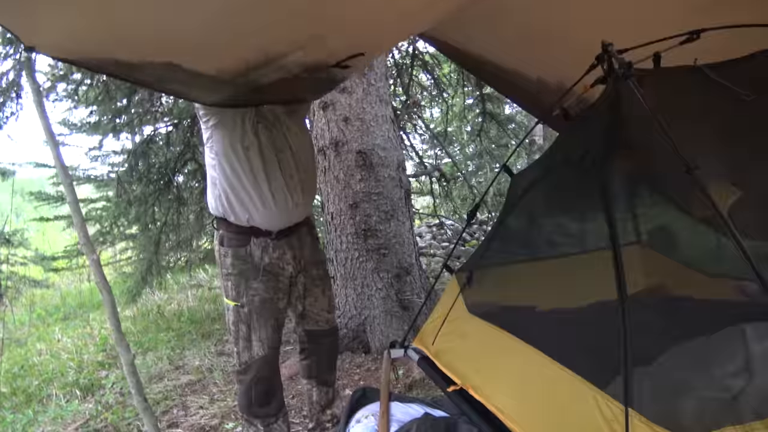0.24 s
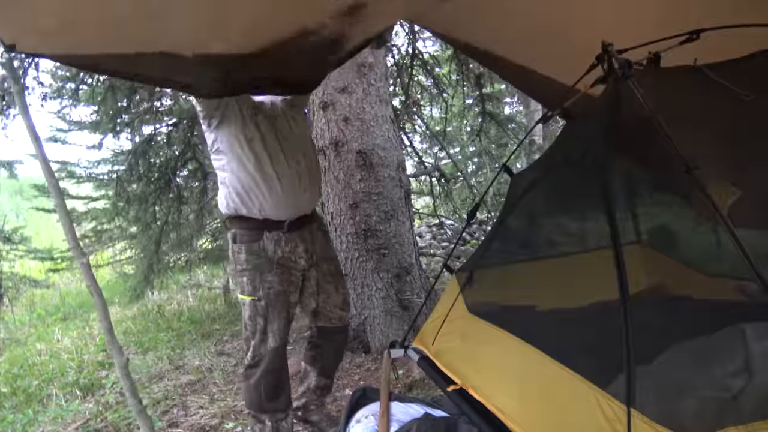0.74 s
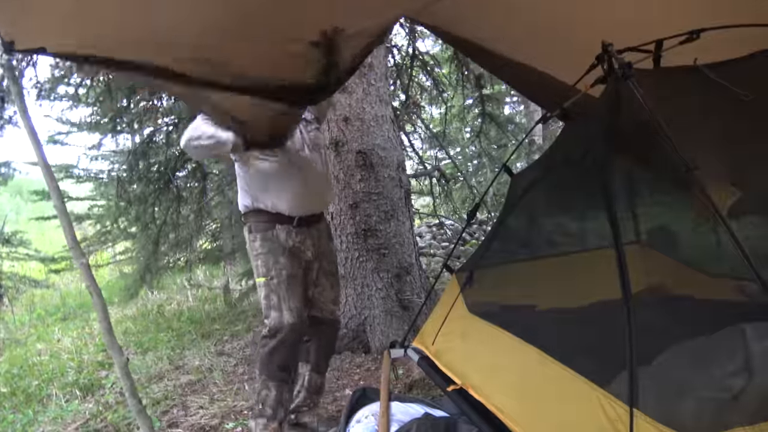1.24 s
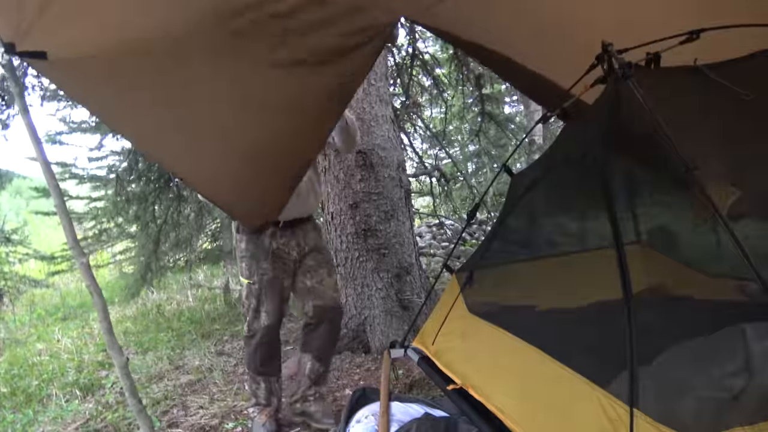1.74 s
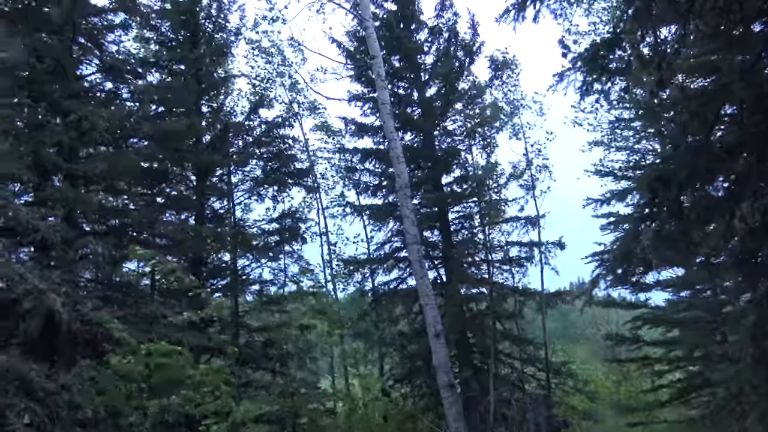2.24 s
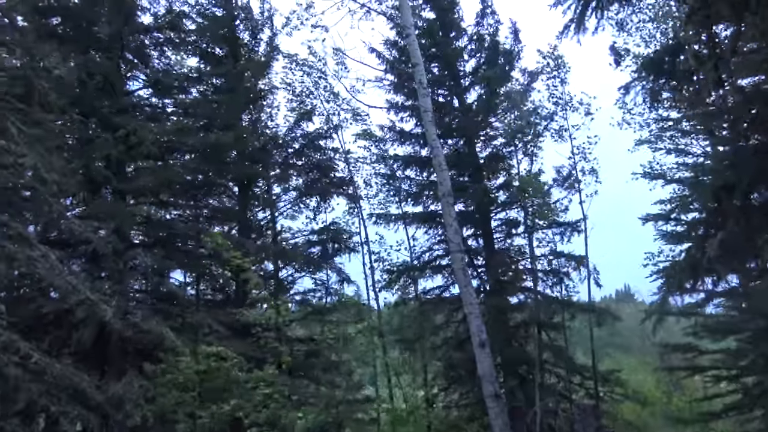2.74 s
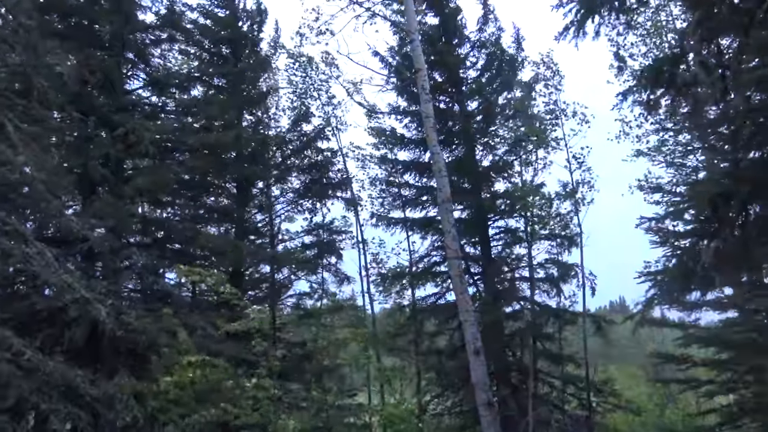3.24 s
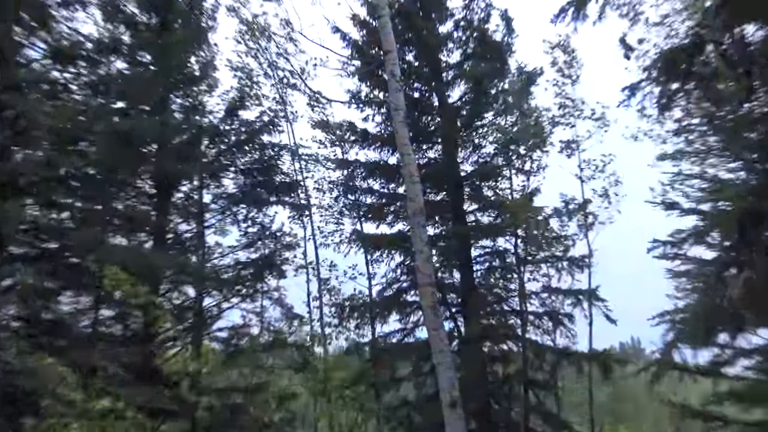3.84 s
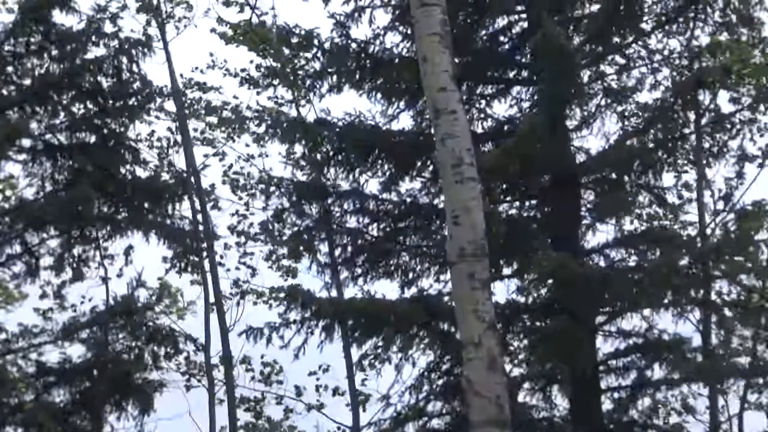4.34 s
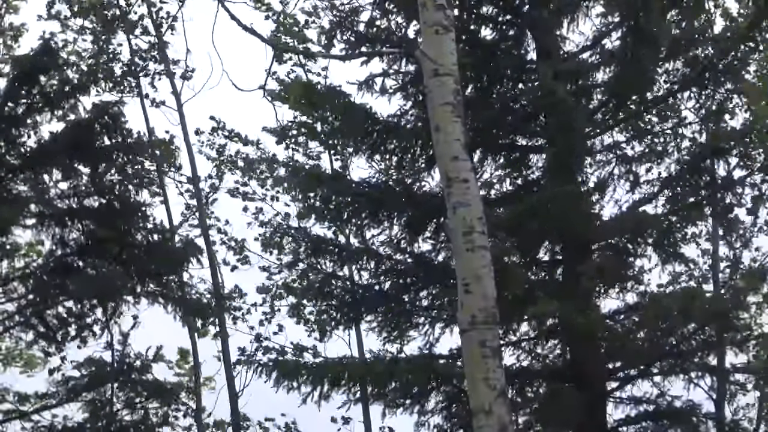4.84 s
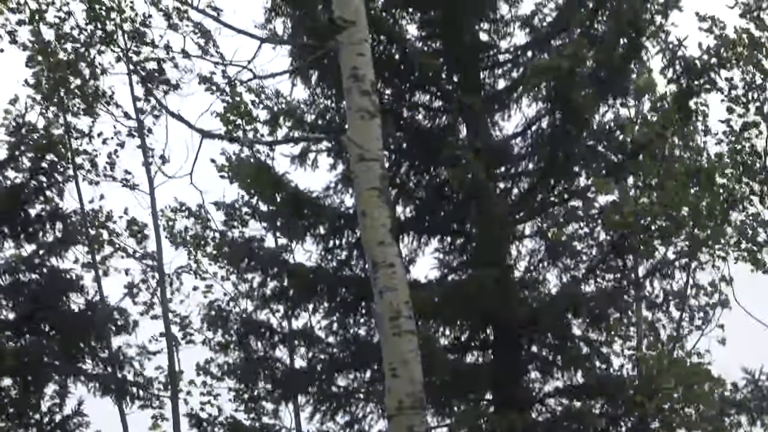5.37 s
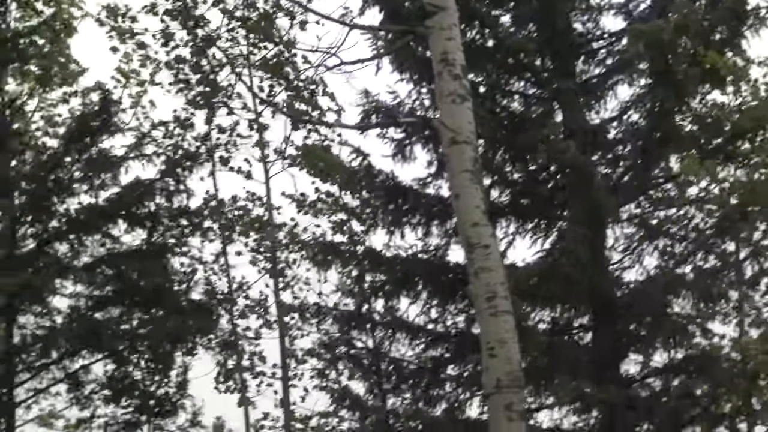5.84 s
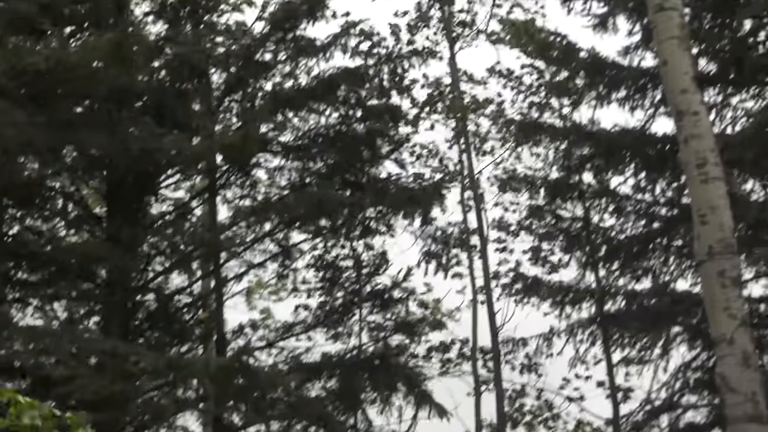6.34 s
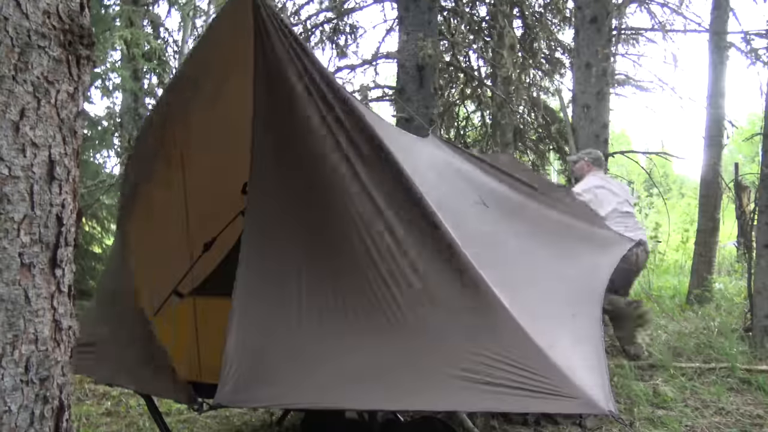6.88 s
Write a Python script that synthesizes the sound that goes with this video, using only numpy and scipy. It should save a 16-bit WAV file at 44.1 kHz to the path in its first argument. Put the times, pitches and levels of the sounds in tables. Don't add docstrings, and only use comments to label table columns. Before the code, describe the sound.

Close, unprotected single microphone outdoors in wind. First a muted wash of needles and low wobbling thuds beneath a cloth shelter, with faint crackles and a hard double snap. Then a sudden change to a fuller rushing of spruce boughs, with a soft cloth snap and gust, building to overloaded low buffeting. The rumble drops away quickly, leaving rushing trees; last, a brief gentler view beside the shelter.

```python
import sys
import numpy as np
from scipy import signal
from scipy.fft import rfft, irfft, next_fast_len
from scipy.io import wavfile
from scipy.ndimage import uniform_filter1d, map_coordinates

SR = 44100
rng = np.random.default_rng(int(sys.argv[2]) if len(sys.argv) > 2 else 0)


def field_ratio(decibels):
    return 10 ** (np.asarray(decibels, dtype=float) / 20)


def wav_out(sig):
    wavfile.write(sys.argv[1], SR, np.round(np.clip(np.atleast_2d(sig).T, -1, 1) * 32767).astype(np.int16))


N = 313551


def unit(x):
    return x / np.sqrt(np.mean(x ** 2) + 1e-20)


def place():
    moves = (2.1512, 6.592)
    return np.searchsorted(moves, np.arange(N) / SR)


def curves(tables):
    t = np.arange(N) / SR
    at_each_place = [np.interp(t, *np.transpose(rows)) for rows in tables]
    return np.choose(place(), at_each_place)


def wobble(rate):
    knots = rng.standard_normal(int(N * rate / SR) + 4)
    return map_coordinates(knots, [np.arange(N) * rate / SR])


def patchy(depth_db):
    z = signal.stft(rng.standard_normal(N + 512), nperseg=512)[2]
    field = uniform_filter1d(rng.standard_normal(z.shape), size=7, axis=0)
    field = uniform_filter1d(field, size=10, axis=1)
    return signal.istft(z * field_ratio(depth_db * unit(field)), nperseg=512)[1][:N]


def split(x, spectrum, edges_hz, steep):
    m = next_fast_len(N + 32768)
    hz = np.fft.rfftfreq(m, 1 / SR) + 1e-3
    f, level_db = np.transpose(spectrum)
    z = rfft(x, m) * field_ratio(np.interp(np.log(hz), np.log(f), level_db))
    below = [0 * hz]
    below += [1 / (1 + (hz / edge) ** steep) for edge in edges_hz]
    below += [1 + 0 * hz]
    shares = [np.sqrt(np.abs(hi - lo)) for lo, hi in zip(below, below[1:])]
    return [unit(irfft(z * share, m)[:N]) for share in shares]


def trees():
    # time in seconds, strength in dB
    crown_wind = [
        [(0, -40), (.4, -40), (.65, -39), (1.05, -41), (1.45, -40.5), (1.65, -42), (2.14, -42)],
        [(2.17, -32), (3.0, -31.5), (3.95, -30), (4.7, -31.5), (5.0, -32), (5.35, -34), (6.1, -34.5),
         (6.58, -33.5)],
        [(6.6, -38), (6.9, -36.5), (7.11, -37.5)],
    ]
    # frequency in Hz, level in dB per Hz
    under_tarp = [(120, -32), (250, -3), (500, -5.5), (1000, -7.5), (1500, -9.5), (2200, -10.5),
                  (5100, -10.5), (6500, -14.5), (8600, -17), (10500, -25.5), (13500, -29), (15600, -34)]
    in_the_open = [(120, -8.5), (250, 2.5), (500, -0.5), (900, -3.5), (1500, -6), (2200, -9.5),
                   (3500, -10.5), (5300, -11.5), (6500, -14.5), (8500, -14.5), (10500, -23.5), (13500, -25),
                   (15600, -31)]
    beside_camp = [(120, -19), (300, 3), (700, 0), (1400, 0), (2200, -3.5), (5100, -5.5), (6500, -7.5),
                   (8600, -11.5), (10500, -17.5), (13500, -23), (15600, -29)]
    roar_offsets = [3.5, 0, 0.5]
    rustle_offsets = [-6, -16.5, -11.5]
    rustle_growth = [1.45, 1, 0.8]
    calm_db = -34
    roar_growth = 0.8

    here = place()
    hiss_db = curves(crown_wind)
    stronger_db = hiss_db - calm_db
    roar_db = calm_db + np.take(roar_offsets, here) + roar_growth * stronger_db
    rustle_db = calm_db + np.take(rustle_offsets, here) + np.take(rustle_growth, here) * stronger_db

    colours = (under_tarp, in_the_open, beside_camp)
    heard = [split(patchy(0.35), colour, (1800, 9000), steep=4.54) for colour in colours]
    roar, hiss, rustle = np.choose(here, np.array(heard))

    flutter_db = 0.25 * wobble(5.9) + 0.25 * wobble(12) + 0.1 * wobble(90)
    roar = field_ratio(roar_db + 0.53 * wobble(3.73)) * roar
    rustle = field_ratio(rustle_db + 0.55 * wobble(15) + 0.36 * wobble(120)) * rustle
    return field_ratio(flutter_db) * (roar + field_ratio(hiss_db) * hiss + rustle)


def buffet():
    # time in seconds, strength in dB
    air_flow = [
        [(0, -31), (.55, -30.5), (1.0, -33.5), (2.14, -33)],
        [(2.17, -35), (2.55, -32.5), (2.9, -36), (3.7, -34), (4.0, -27), (4.7, -20), (5.2, -22), (5.27, -13),
         (5.66, -12.5), (5.84, -37.5), (6.2, -38), (6.58, -34.5)],
        [(6.6, -35), (7.11, -31.5)],
    ]
    # frequency in Hz, level in dB per Hz
    eddy_colour = [(3, -6), (9, 6.5), (17, 6.5), (27, 6), (40, -3.5), (58, -6), (80, -14), (130, -20),
                   (220, -28.5), (330, -38), (600, -52), (1200, -120)]
    # levels of heave, thump, flutter and rattle at one place in dB
    still_levels = [
        (-23.5, -35.5, -41.5, -46),
        (-27.5, -35, -41, -41.5),
        (-26.5, -35, -41, -46.5),
    ]
    eddy_growth = [0.66, 1.13, 0.83, 0.47]
    # time in seconds, lift in dB, length in seconds,
    # eddy size from 0 for heave to 3 for rattle
    swirls = [(.13, 11.5, .06, -2), (.28, -10, 0.069, -0.5), (0.425, 8, 0.19, 0), (0.533, 14, 0.055, 1),
              (1.03, -5, 0.065, 3), (1.206, 5.5, 0.083, -1.5), (1.22, -6, .05, 2.5), (1.363, 8.5, .05, 0.7),
              (1.6, 8, 0.12, 0), (1.81, -9, 0.099, 2), (2.006, 9, 0.092, 0), (2.503, 11.5, .06, 0.7),
              (3.397, -5, 0.042, 1), (3.507, 19, .06, 1.4), (3.74, 20, 0.071, -1.5), (3.996, 10, 0.063, .4),
              (4.653, 4.5, .08, 3), (4.39, -11, 0.07, 0), (4.525, -1, 0.035, 0), (4.817, 12, 0.034, 1.8),
              (4.9, 8.5, 0.073, 1.5), (5.057, 12.5, 0.059, 1.7), (5.197, 14, .04, 0), (5.29, 7, 0.055, 1.1),
              (5.483, 5.5, 0.028, 1.3), (5.609, 5.5, 0.047, 1.6), (6.153, -9, 0.096, 2.7),
              (6.51, 10, 0.041, 0), (6.7, 5, 0.056, 1), (6.88, 5.5, 0.038, 0)]
    still_db = -32
    reach = 0.84

    t = np.arange(N) / SR
    sizes = np.arange(len(eddy_growth))[:, None]
    levels_db = np.transpose(still_levels)[:, place()]
    levels_db = levels_db + np.outer(eddy_growth, curves(air_flow) - still_db)
    for s, lift_db, length, size in swirls:
        stirred = np.exp(-((sizes - size) / reach) ** 2)
        levels_db = levels_db + lift_db * stirred * np.exp(-((t - s) / length) ** 2)

    eddies = np.array(split(rng.standard_normal(N), eddy_colour, (32, 75, 160), steep=9.7))
    swing = np.abs(signal.hilbert(eddies, next_fast_len(N))[:, :N])
    evenness = np.array([[0.6], [0.7], [0.55], [0.4]])
    eddies = eddies / (swing + 1.3) ** evenness
    eddies[1:] *= field_ratio(1.4 * wobble(22))
    return sum(field_ratio(db) * unit(eddy) for db, eddy in zip(levels_db, eddies))


def tarp():
    # time in seconds, peak in dB, push in seconds, settling in
    # seconds
    snaps = [
        (1.4162, -8.5, 0.00053, 0.00058),
        (1.42, -12, 0.00075, 0.00077),
        (1.4277, -21, 0.00059, .0005),
        (3.4376, -20, 0.001, 0.0015),
        (3.44, -14, .001, 0.0011),
    ]
    # time in seconds, rms level in dB, length in seconds
    crackles = [
        (0.597, -45, .07),
        (.77, -45, 0.076),
        (1.247, -45, .004),
        (1.523, -39, .011),
        (1.859, -40, .003),
        (1.877, -46, .025),
    ]
    # frequency in Hz, level in dB per Hz
    cloth_colour = [(1500, -120), (3000, -9), (6500, -6), (8500, 0), (10000, -9), (13500, -13),
                    (15600, -22), (17000, -120)]

    t, out = np.arange(N) / SR, np.zeros(N)
    for s, peak_db, push, settle in snaps:
        release = np.tanh((t - s) / (0.3 * push))
        fade = np.exp(-np.abs(t - s) / np.where(t < s, push, settle))
        out -= field_ratio(peak_db) * release * fade * np.where(t < s, 0.7, 1.3)
    folds = sum(field_ratio(level_db) * np.exp(-((t - s) / length) ** 2 * 2) for s, level_db, length in crackles)
    grains = rng.standard_normal(N) * field_ratio(4 * wobble(500))
    return out + folds * split(grains, cloth_colour, (), steep=2)[0]


def puffs():
    # time in seconds, rms level in dB, 60 dB decay in seconds
    gusts = [
        (3.43, -25, 0.32),
        (4.68, -36, 0.16),
        (5.62, -22, 0.16),
    ]
    # frequency in Hz, level in dB per Hz
    puff_colour = [(30, -120), (60, -3), (150, 0), (300, -8.5), (500, -15), (1000, -120)]

    t, bursts = np.arange(N) / SR, np.zeros(N)
    for s, level_db, t60 in gusts:
        rise = np.clip((t - s) / 0.0033, 0, 1)
        bursts += field_ratio(level_db - 60 * np.abs(t - s) / t60) * rise
    return bursts * split(rng.standard_normal(N), puff_colour, (), steep=2)[0]


def choke():
    # time in seconds, loss in dB, length in seconds
    blocks = [
        (5.202, -4, 0.0059),
        (5.262, -11, 0.0012),
        (5.348, -3, 0.0055),
    ]
    t = np.arange(N) / SR
    return field_ratio(sum(loss_db * np.exp(-((t - s) / length) ** 4) for s, loss_db, length in blocks))


def strap():
    # time in seconds, peak in dB
    ticks = [
        (5.3032, -10),
        (5.3358, -14),
    ]
    t, out = np.arange(N) / SR, np.zeros(N)
    for s, peak_db in ticks:
        swing = (t - s) / 0.00012
        out += field_ratio(peak_db) * swing * np.exp(-swing ** 2)
    return out


def scene():
    pressure = buffet() + puffs()
    pressure = pressure / (1 + np.abs(pressure / 1.2) ** 5) ** (1 / 5)
    return (choke() * trees() + pressure + tarp() + strap())[None]


def roll_off(x):
    return signal.sosfilt(signal.butter(12, 15710, fs=SR, output="sos"), x)


def record(dry):
    mix = np.clip(dry, -1, 1)
    return roll_off(mix)


dry = scene()
out = record(dry)
wav_out(out)
```